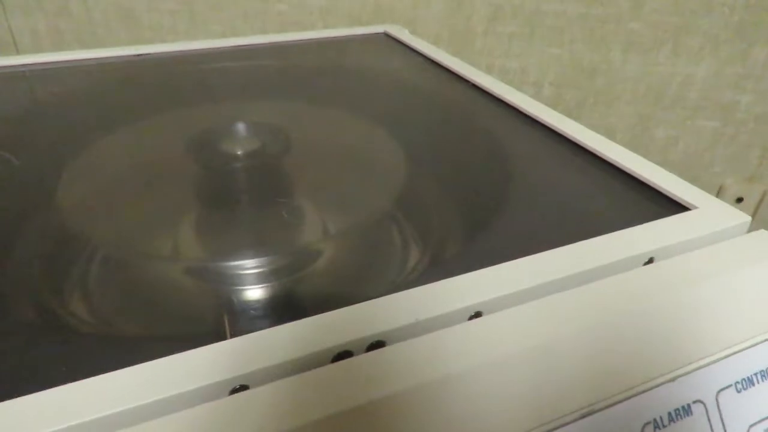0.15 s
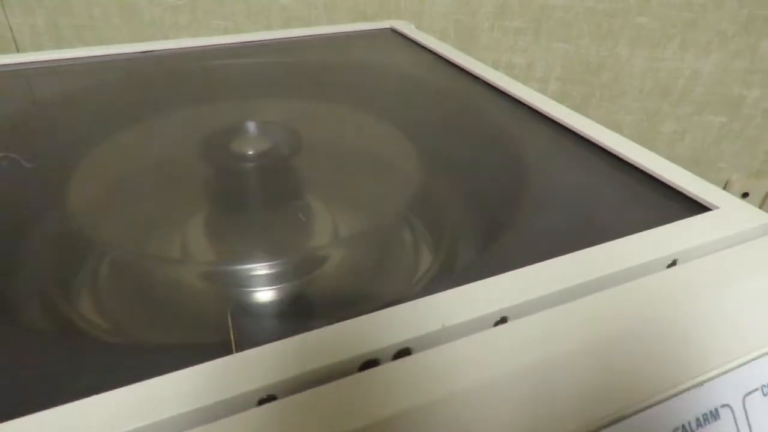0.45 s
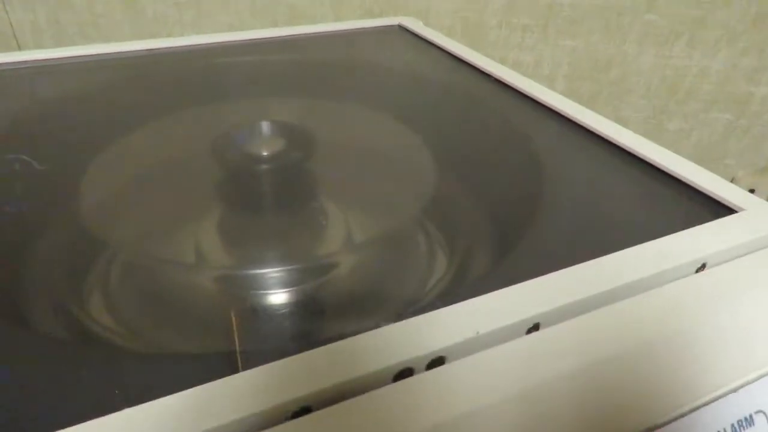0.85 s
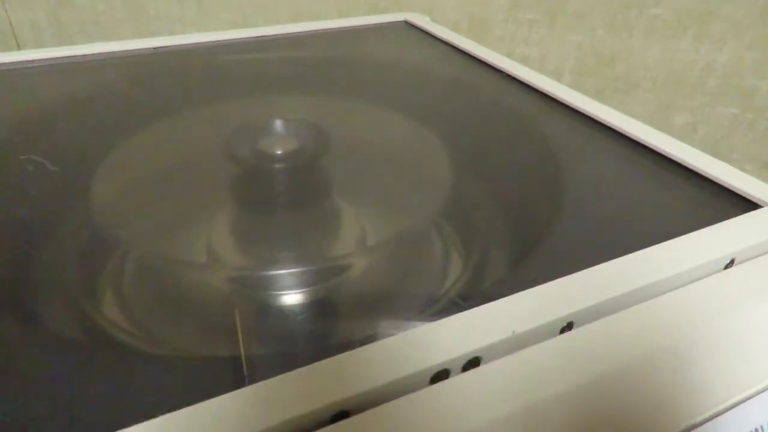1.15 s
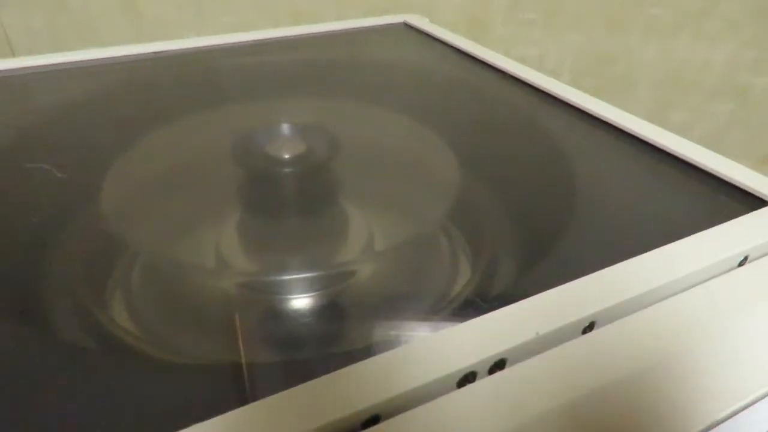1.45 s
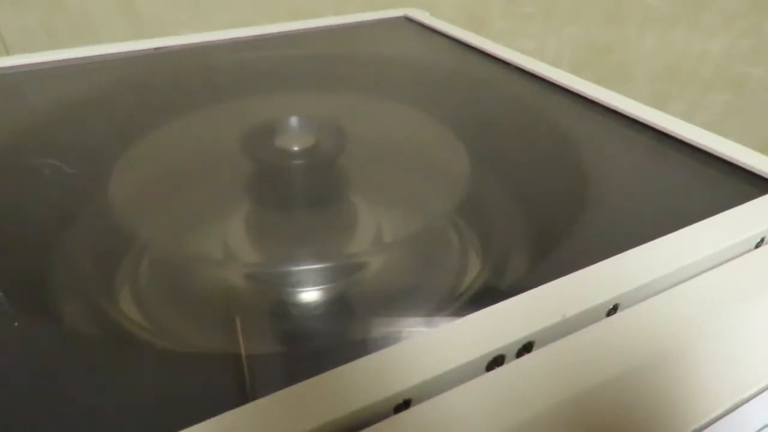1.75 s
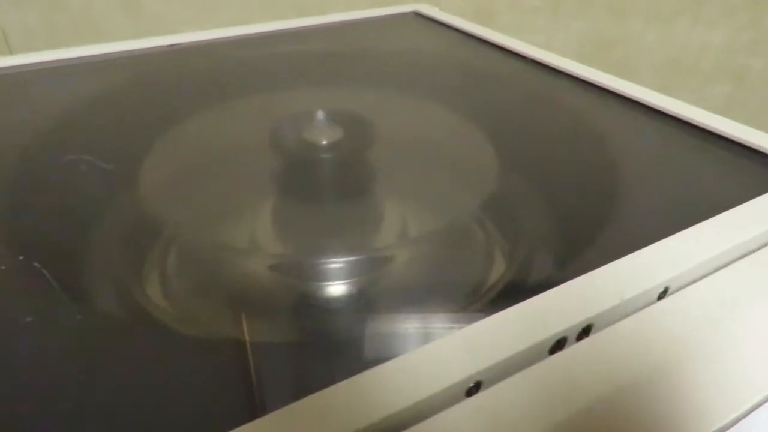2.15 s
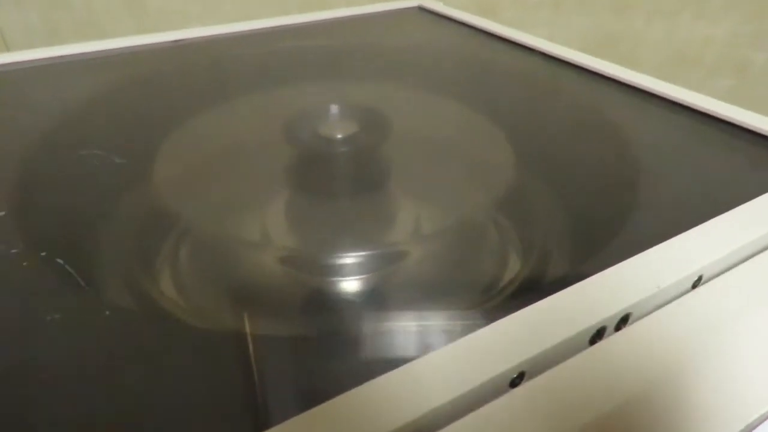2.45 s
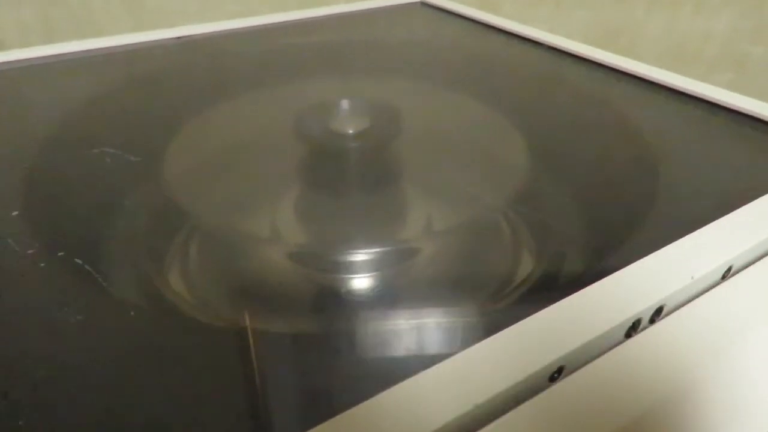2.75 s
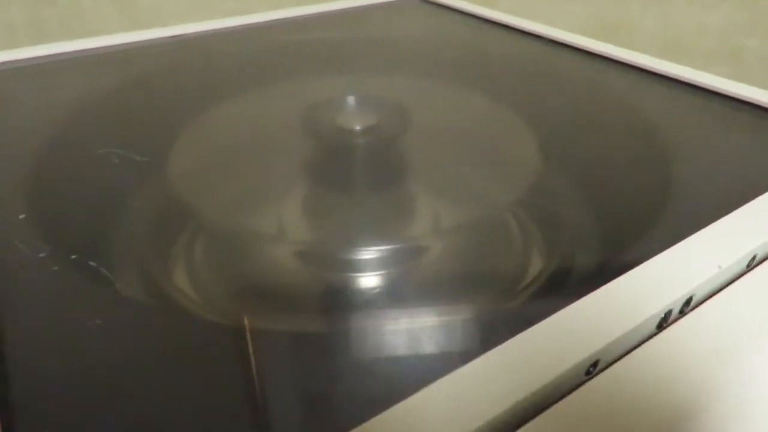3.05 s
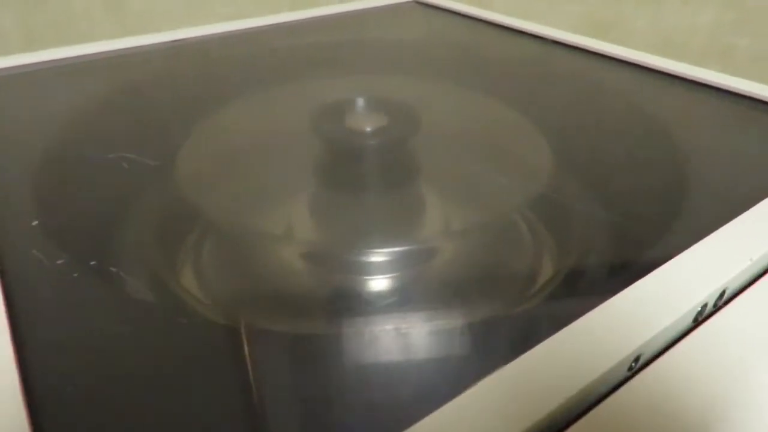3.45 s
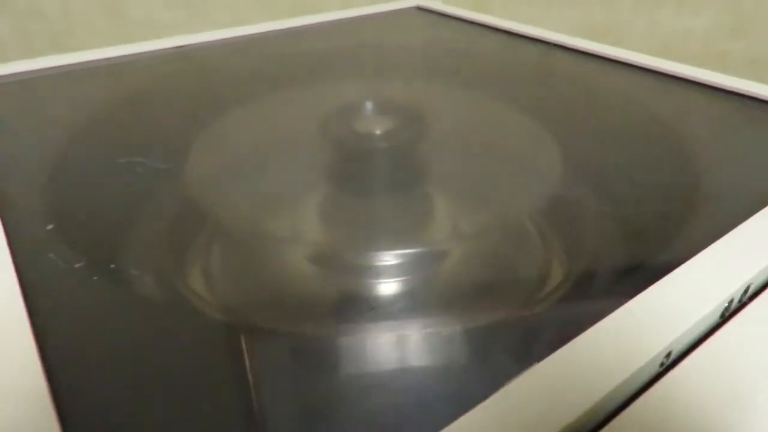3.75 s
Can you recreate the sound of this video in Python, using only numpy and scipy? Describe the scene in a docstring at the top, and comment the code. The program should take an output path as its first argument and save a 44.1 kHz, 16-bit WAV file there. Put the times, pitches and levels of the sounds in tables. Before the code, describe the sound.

Close handheld capture of a spinning lab centrifuge: continuous rough drone with a strong tone near 340 hertz, muffled air rush, faint fan hum, and a fluttering metallic whine that gradually recedes. No start or stop.

```python
"""A steady hum at multiples of a rotor's turn: a benchtop centrifuge under its closed lid, miked close by.
A seven-ball bearing whines, rings and scuffs in step with shaft and cage; these are phase-locked tones and gated noise.
Air rushing round the bowl is noise in bands; a cooling fan and the mains hum underneath as plain tones.
The small handheld microphone pair drifts, so bass grows and whine fades."""
import sys
import numpy as np
from scipy import signal
from scipy.fft import rfft, irfft
from scipy.io import wavfile
from scipy.ndimage import uniform_filter1d

SR = 44100
rng = np.random.default_rng(int(sys.argv[2]) if len(sys.argv) > 2 else 0)


def store_wav(level_fs):
    """Save 16-bit WAV to argv[1]."""
    pcm = np.round(np.clip(np.atleast_2d(level_fs), -1, 1) * 32767)
    wavfile.write(sys.argv[1], SR, pcm.T.astype(np.int16))


N = 171549  # length in samples

# Handheld microphone drift. Each row: time in seconds, bass change in dB, bearing whine change in dB,
# bearing ring change in dB.
DRIFT_PATH = [(0.0, -2.5, 3, -2), (0.998, -1.4, 1, -3.5), (1.999, 0.3, -0.5, -3), (2.3, 1, -4.5, -1.9),
              (2.6, 0.5, -4, -4), (2.801, 2, -5, -4.5), (3.3, 1.7, -9, -6), (3.89, 1.8, -22, -8.5)]
LEAD_S = .00005  # the left microphone hears the partials with a nonzero lead frequency this much early
FADE_S, TOP_HZ = .003, 15100  # recorder edges and top limit

# Fan and mains tones, their common starting phase, and the level of each in dB rms before its waver.
HUM_HZ, HUM_RAD = [58.81, 120, 240, 360], 4.0
HUM_LEVELS = [-40, -53, -43.5, -50]

# Air in the bowl, shared by both microphones. Each row: frequency in Hz, density in dB per Hz.
AIR_SPECTRUM = [(25, -77), (50, -73), (80, -65.5), (115, -64), (150, -59), (190, -64), (245, -56.5),
                (292, -65), (335, -56.5), (400, -57.5), (480, -58), (565, -65.5), (600, -61), (680, -65),
                (900, -66.5), (1100, -71.5), (1500, -74), (2000, -76.5), (2700, -81.5), (3300, -89),
                (4100, -88.5), (5000, -92), (7000, -95), (9000, -103.5), (11000, -105), (12500, -117),
                (15000, -132)]
# Left-right difference of all noise. Each row: frequency in Hz, differing part over shared part in dB.
STEREO_WIDTH = [(30, -33.5), (150, -11), (400, -15.5), (1000, -17), (2500, -14), (4900, -13), (6500, -11),
                (8200, -8), (9400, 10), (10800, 4.5), (15000, 6)]
SWELL_DB, FLICKER_DB, WHIP_DB = .3, 1.35, 2.1

# Bearing: cage turns per shaft turn; seven balls pass in one cage turn.
CAGE_SHARE, BALL_COUNT = .371815, 7
# Whine partials, as multiples of the cage turn (those of seven are ball passes).
WHINE_MULTIPLES = [14, 42, 49, 56, 71, 97, 98, 105, 107, 126, 133, 135, 140, 144, 146, 147, 150, 161, 169,
                   172, 175, 179, 182, 186, 200]
# Level of each whine partial in dB rms, before drift, waver and wobble.
WHINE_LEVELS = [-59, -42.5, -37, -34.5, -54.5, -56, -55.5, -52, -58.5, -61, -57, -61, -63, -57, -58.5,
                -60.5, -65, -64, -61, -45.5, -60.5, -64, -63, -53, -69]
WOBBLE = .36, .1  # share by which the shaft swings the whine, once and twice a turn
CAGE_RAD, WHINE_RAD = -.207, -.4  # phase of the whine: per order, all
# Seventh ball-pass multiple mixed with the shaft: cage multiple, and shaft multiples added to it.
MIX_FROM, MIX_ORDERS = 49, [-16, -8, -2, 6]
# Level of each mixed tone in dB rms, before waver.
MIX_LEVELS = [-61, -50.5, -50.5, -58.5]
# Housing resonances rung by passing balls. Each row: centre in Hz, width in Hz, level in dB rms
# of the shared part before drift and waver.
HOUSING_RING = [(1328, 70, -47), (1816, 90, -50), (2208, 380, -45.5), (2850, 550, -56)]
RING_DUTY = .21  # ball passes from the start of a ring to its peak
TICK_HZ, TICK_WIDTH_HZ, TICK_DUTY, TICK_DB = 4880, 450, .07, -65  # once a turn; duty in turns, dB rms
SCUFF_HZ, SCUFF_WIDTH_HZ, SCUFF_DB = 7800, 4500, -69  # dB rms
CAGE_MARK, SCUFF_SHARP = .11, 1.9  # cage position (turns) of the hardest scuff, and how selective it is
RISE_DB_PER_S = .7  # the tick grows at this rate as the microphone drifts, the scuff at twice it

# Rotor speed: steady, then sagging slowly.
TURN_HZ, SAG_FROM_S, SAG_HZ_PER_S = 33.797, 1.22, .048
# Rotor partials, as multiples of the turn.
ROTOR_MULTIPLES = [1, 2, 3, 4, 5, 6, 7, 8, 10, 11, 12, 13, 14, 15, 16, 17, 18, 19, 23, 26, 28, 29, 30, 31,
                   34, 35, 66, 73, 79, 81]
# One row per rotor multiple. Each row: level in dB rms before drift and waver, left minus right in dB,
# share of the bass drift it follows.
ROTOR_LEVELS = [(-50.5, -1.6, 1), (-44, 0.7, 0.8), (-29.5, -0.2, .6), (-30.5, -1.1, 0.1), (-40, 1.5, 1.2),
                (-28.5, 1.5, 1), (-53.5, 3.5, -1.6), (-28.5, 1, .45), (-17.5, .51, 0.22), (-31, 2.5, 1.3),
                (-38, -0.2, -.6), (-35, 2, -1), (-53.5, .3, -2.2), (-42, 0, 1.5), (-48, -2.2, -2.5),
                (-54, 4, 0.5), (-42, -1, -1.1), (-51, 7, -2.5), (-60, 0.5, -0.5), (-55, 3.5, 1),
                (-54, 0.4, 3.1), (-62.5, -0.8, -0.8), (-60, 1, -3), (-56.5, -1.3, 1.3), (-56.5, -1.5, .01),
                (-58, 2, -2.5), (-64, -2.2, -2.8), (-71, -3.2, 1.3), (-71, .1, 0.7), (-70.5, 1.7, 0.7)]
BEND_RAD, SMEAR_RAD, MARK_RAD, START_RAD = .0396, 3.93, -2.26, -1.22  # per order cubed, squared, per order, all
LATE_ORDER, LATE_DB, LATE_S = 13, -20.5, 1  # starts out cancelled at the microphone and grows in
WAVER_DB = .8  # slow waver of weak rotor tones


def undb(db):
    """dB to gain."""
    return 10 ** (np.asarray(db) / 20)


def level(x, db):
    """Scale to an rms level."""
    return x * undb(db) / np.sqrt(np.mean(x ** 2))


def walk(rate):
    """Random levels held 1 / rate s and slewed twice; spread near 1."""
    hold = int(SR / rate)
    steps = np.repeat(rng.standard_normal(N // hold + 1), hold)
    slewed = uniform_filter1d(uniform_filter1d(steps, hold), hold)
    return 1.3 * slewed[:N]


def puff(turns, duty):
    """Once a cycle: a quick rise and a slower fall, peak 1 after duty turns."""
    x = turns % 1 / duty
    return x * np.exp(1 - x)


def on_log(table, hz):
    """Read a spectrum table along log frequency."""
    table = np.array(table)
    return np.interp(np.log(hz), np.log(table[:, 0]), table[:, 1])


def band(hz, width_hz):
    """Noise through a steep resonance."""
    f = np.arange(N // 2 + 1) * SR / N + 1e-3  # offset avoids dividing by zero
    detuning = (f - hz ** 2 / f) / width_hz
    return irfft(rfft(rng.standard_normal(N)) / (1 + detuning ** 2) ** 2, N)


def pair(hz, width_hz):
    """Left and right noise of one band: shared part at rms 1 and a part of opposite sign in each."""
    shared = level(band(hz, width_hz), 0)
    differing = level(band(hz, width_hz), on_log(STEREO_WIDTH, hz))
    return shared + differing * np.array([[1], [-1]])


def tone(turns, hz, db, pan_db, phase):
    """One partial in both channels; hz sets how far the left leads in phase."""
    side = np.array([[.5], [-.5]])
    gain = np.sqrt(2) * undb(db + pan_db * side)
    return gain * np.sin(2 * np.pi * (turns + hz * LEAD_S * side) + phase)


def fan_and_mains(t):
    """Cooling fan and mains harmonics: fixed tones that waver slightly in level."""
    return sum(tone(hz * t, hz, db + .6 * walk(5.6), 0, HUM_RAD) for hz, db in zip(HUM_HZ, HUM_LEVELS))


def air(turns):
    """Bands a fifth of an octave apart swell together, flicker alone and, up high, are whipped once a turn."""
    out, swell, whip = 0, walk(.54), puff(turns, .051)
    for hz in 25 * 2 ** np.arange(0, 9.3, 1 / 5):
        db = on_log(AIR_SPECTRUM, hz) + 10 * np.log10(hz * .14)  # density times bandwidth
        motion_db = SWELL_DB * swell + FLICKER_DB * walk(18) + WHIP_DB * whip * (hz > 2000)
        out = out + pair(hz, hz * .25) * undb(db + motion_db)
    return out


def bearing_scuff(turns, t):
    """Broad noise once a turn, strongest on turns when shaft and cage marks meet."""
    cage_at_turn = CAGE_SHARE * np.floor(turns)
    meet = np.exp(SCUFF_SHARP * np.cos(2 * np.pi * (cage_at_turn - CAGE_MARK)))
    stroke = np.abs(np.sin(np.pi * turns))
    growth = undb(2 * RISE_DB_PER_S * t + 1.5 * walk(3))
    return level(meet * stroke * growth * pair(SCUFF_HZ, SCUFF_WIDTH_HZ), SCUFF_DB)


def bearing_tick(turns, t):
    """A narrow noise band that never falls silent and is struck once a turn."""
    growth = undb(RISE_DB_PER_S * t + 1.5 * walk(2.7))
    return level((.6 + puff(turns, TICK_DUTY)) * growth * pair(TICK_HZ, TICK_WIDTH_HZ), TICK_DB)


def bearing_ring(cage, ring_db):
    """Each ball pass excites the housing resonances, heard as pulsed noise bands."""
    ring = sum(pair(hz, width) * undb(db + .7 * walk(15)) for hz, width, db in HOUSING_RING)
    pulses = level(.59 + puff(BALL_COUNT * cage, RING_DUTY), 0)
    return undb(ring_db) * ring * pulses


def bearing_whine(turns, cage, whine_db, ring_db):
    """Tones locked to the cage, swung by the shaft, plus tones where ball pass and shaft mix."""
    whine = 0
    for k, db in zip(WHINE_MULTIPLES, WHINE_LEVELS):
        drift_db = whine_db if k < 100 else ring_db
        waver_db = .7 * min(k / 56, 2) * walk(20)
        phase = CAGE_RAD * k + WHINE_RAD + k / 300 * walk(8)  # high orders jitter more
        whine = whine + tone(k * cage, 0, db + drift_db + waver_db, -.3, phase)
    whine = whine * (1 + WOBBLE[0] * np.cos(2 * np.pi * turns) + WOBBLE[1] * np.sin(4 * np.pi * turns))
    for k, db in zip(MIX_ORDERS, MIX_LEVELS):
        phase = rng.uniform(0, 2 * np.pi)
        whine = whine + tone(MIX_FROM * cage + k * turns, 0, db + 1.1 * walk(3.6), .1, phase)
    return whine


def bearing(turns, t, whine_db, ring_db):
    """Balls and cage roll at a fixed share of the shaft's turn and drive whine, ring, tick and scuff."""
    cage = CAGE_SHARE * turns
    tones = bearing_whine(turns, cage, whine_db, ring_db)
    return tones + bearing_ring(cage, ring_db) + bearing_tick(turns, t) + bearing_scuff(turns, t)


def rotor(turns, t, low_db):
    """The spinning rotor hums at multiples of its turn; the weaker ones waver more."""
    late_db = LATE_DB * np.maximum(1 - t / LATE_S, 0)
    out = 0
    for k, (db, pan_db, share) in zip(ROTOR_MULTIPLES, ROTOR_LEVELS):
        waver_db = WAVER_DB * (-db - 14.0) / 24 * walk(5.02)
        now_db = db + share * low_db + late_db * (k == LATE_ORDER) + waver_db
        phase = BEND_RAD * k ** 3 + SMEAR_RAD * k * k + MARK_RAD * k + START_RAD
        out = out + tone(k * turns, k * TURN_HZ, now_db, pan_db, phase)
    return out


def scene():
    """Fan and mains, air, bearing and rotor, all but the first in step with one shaft."""
    t = np.arange(N) / SR
    turns = np.cumsum(TURN_HZ - SAG_HZ_PER_S * np.maximum(t - SAG_FROM_S, 0)) / SR
    drift = np.array(DRIFT_PATH)
    low_db, whine_db, ring_db = (np.interp(t, drift[:, 0], column) for column in drift.T[1:])
    background = fan_and_mains(t) + air(turns)
    return background + bearing(turns, t, whine_db, ring_db) + rotor(turns, t, low_db)


def record(dry):
    """The recorder opens and closes softly and cuts the top with a steep low-pass."""
    to_nearest_end = np.minimum(np.arange(N), np.arange(N)[::-1])
    edge = np.minimum(to_nearest_end / (FADE_S * SR), 1)
    low_pass = signal.ellip(8, .2, 70, TOP_HZ, fs=SR, output="sos")
    return signal.sosfilt(low_pass, dry * edge)


dry = scene()
out = record(dry)
store_wav(out)
```